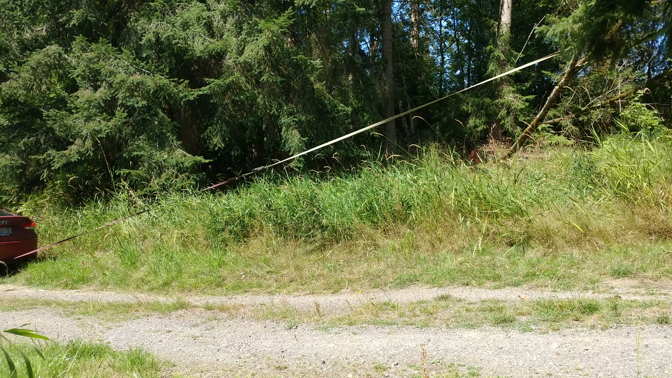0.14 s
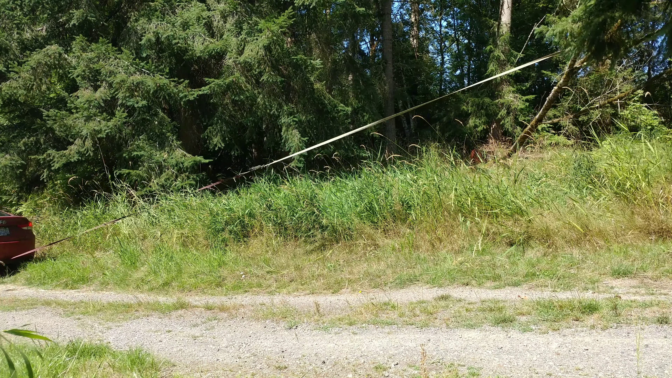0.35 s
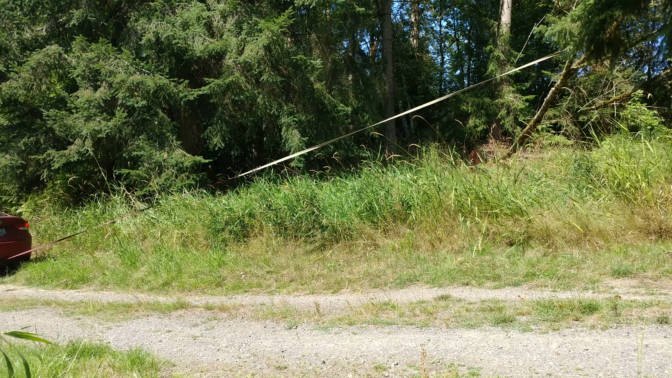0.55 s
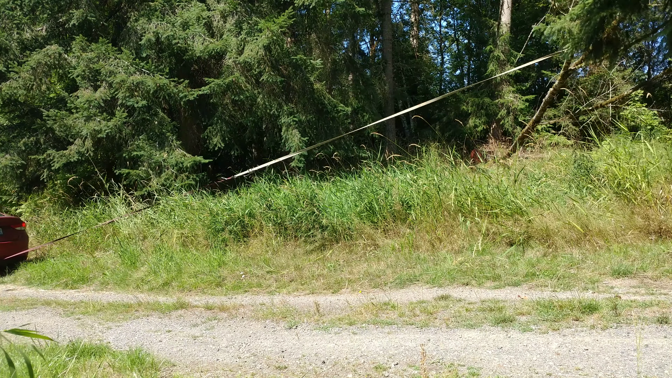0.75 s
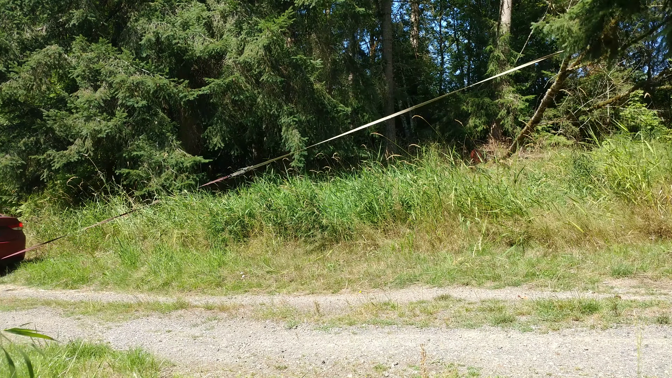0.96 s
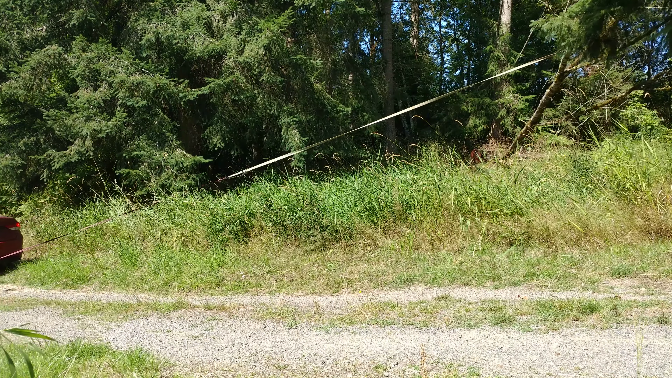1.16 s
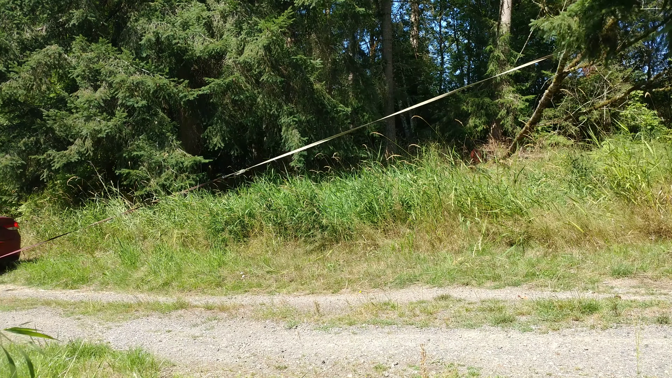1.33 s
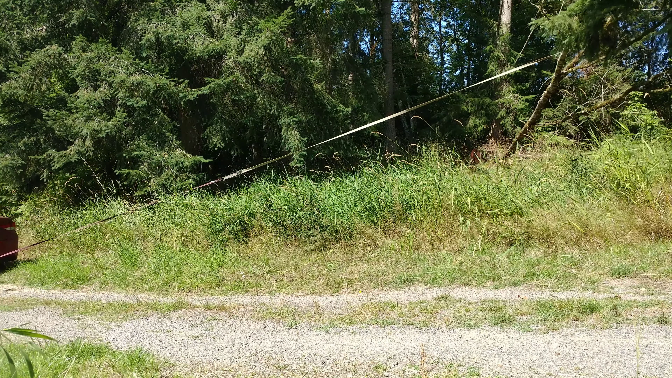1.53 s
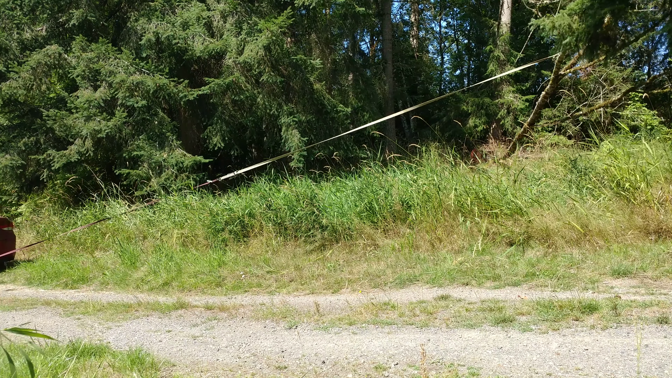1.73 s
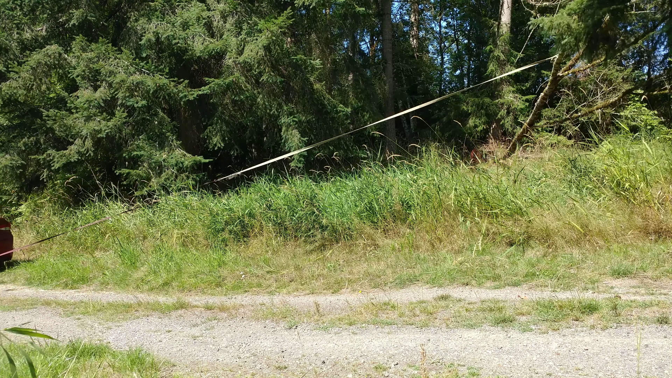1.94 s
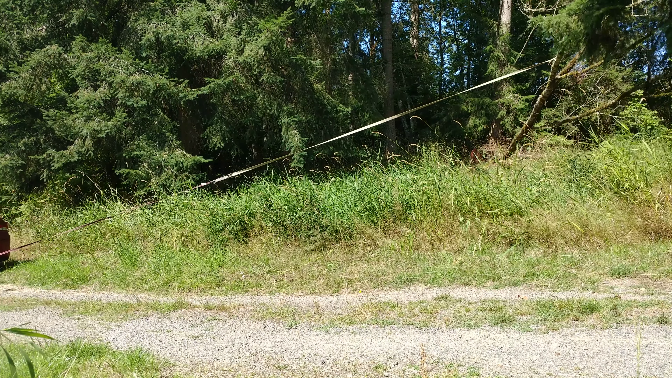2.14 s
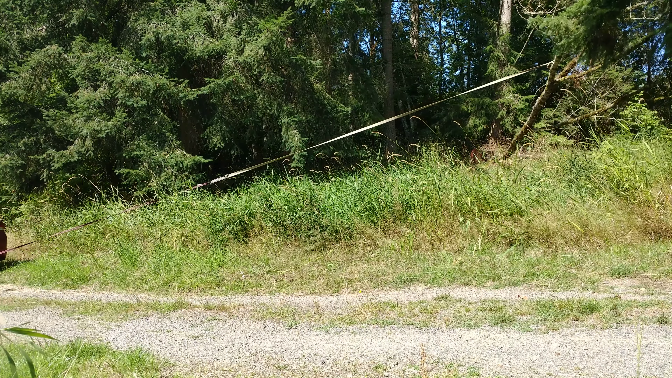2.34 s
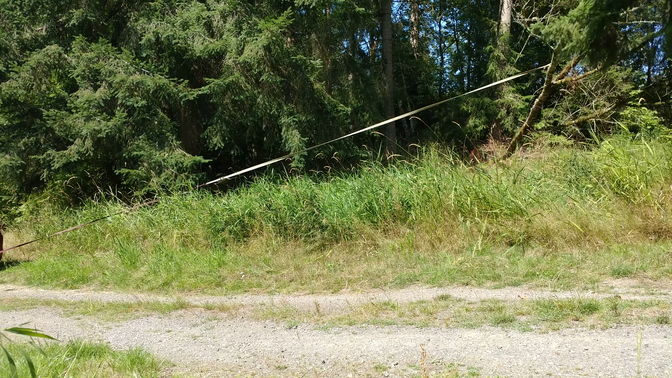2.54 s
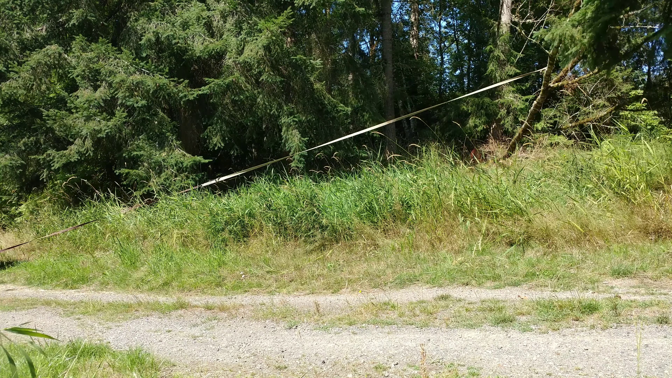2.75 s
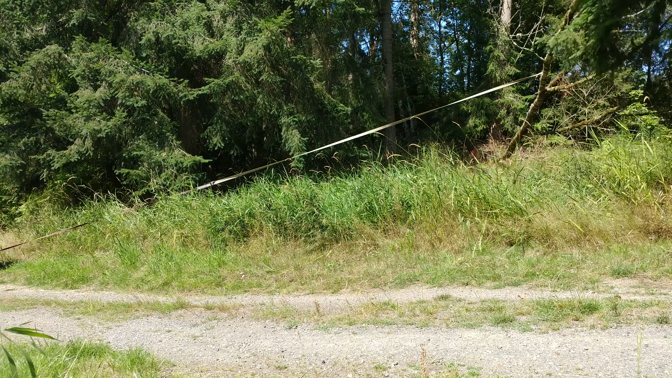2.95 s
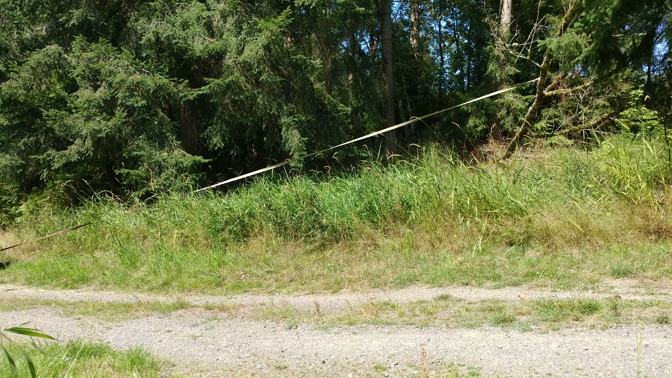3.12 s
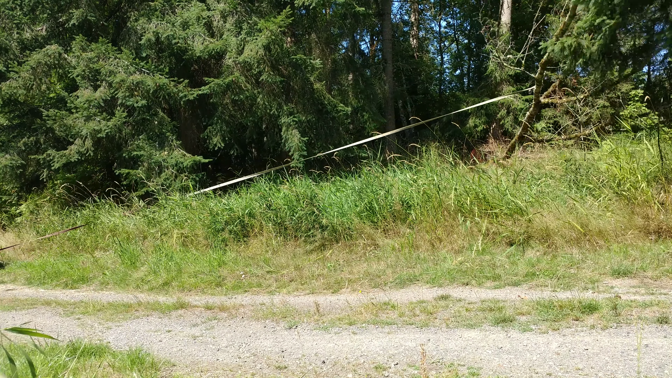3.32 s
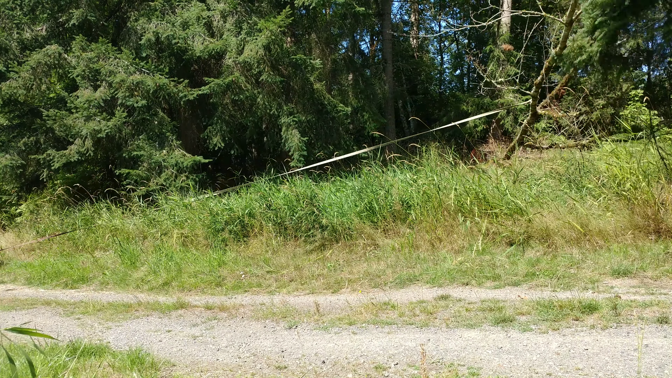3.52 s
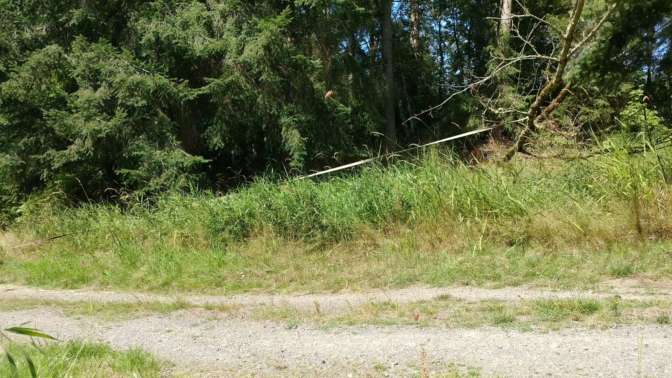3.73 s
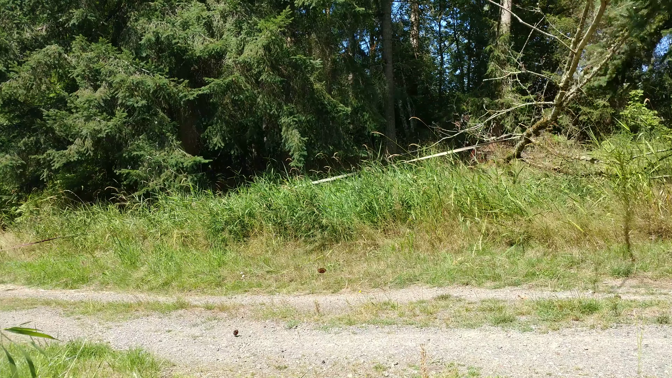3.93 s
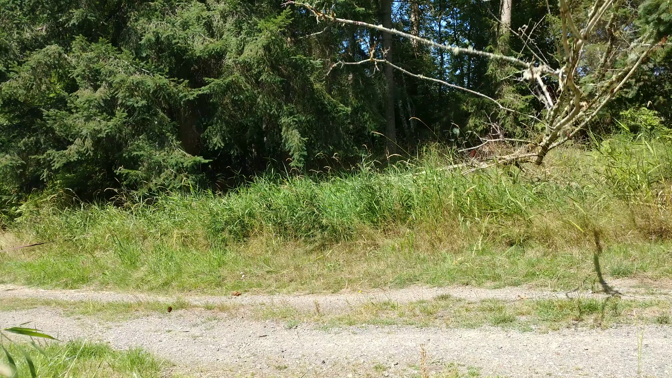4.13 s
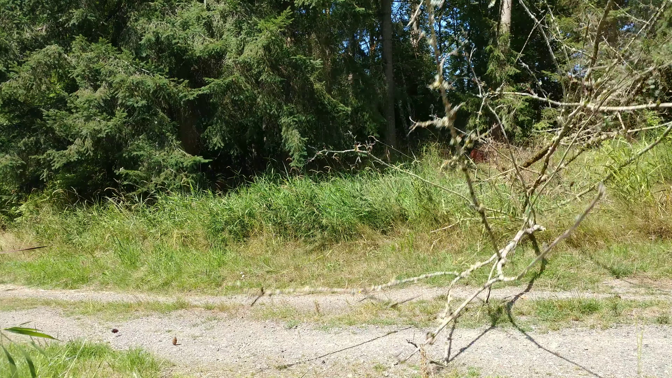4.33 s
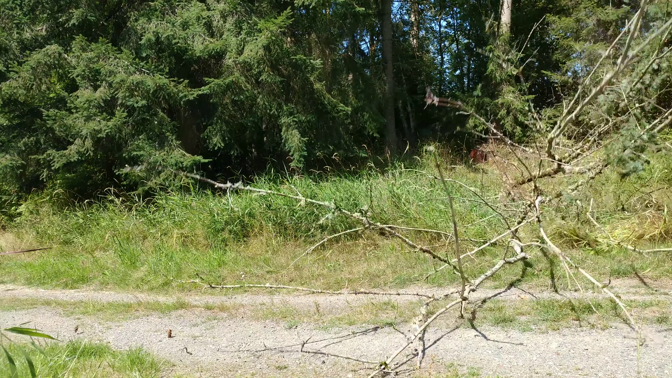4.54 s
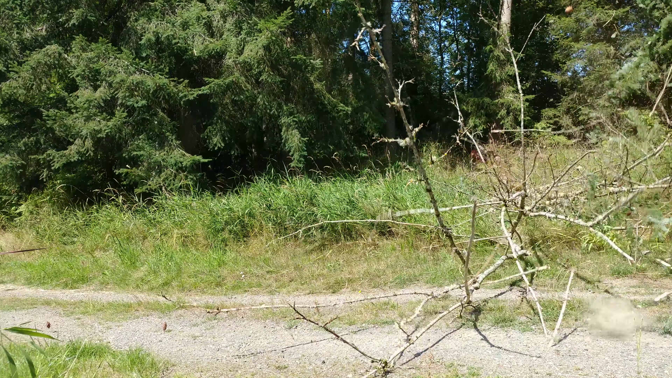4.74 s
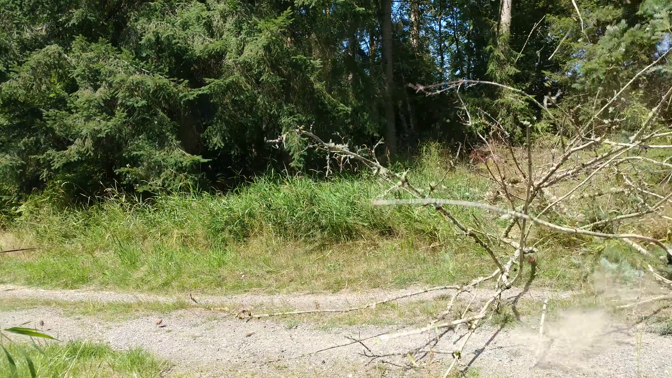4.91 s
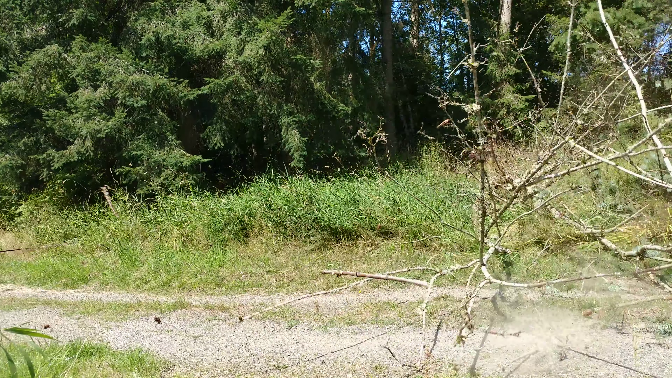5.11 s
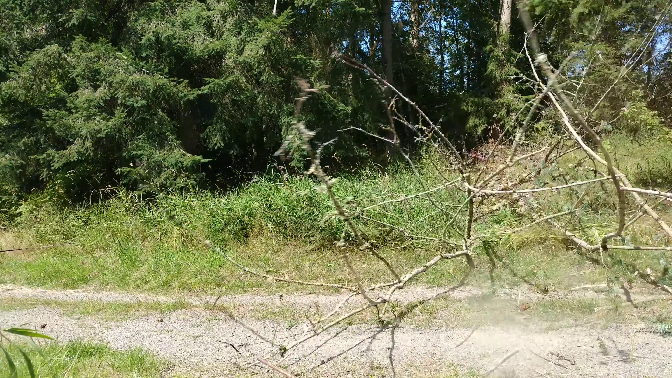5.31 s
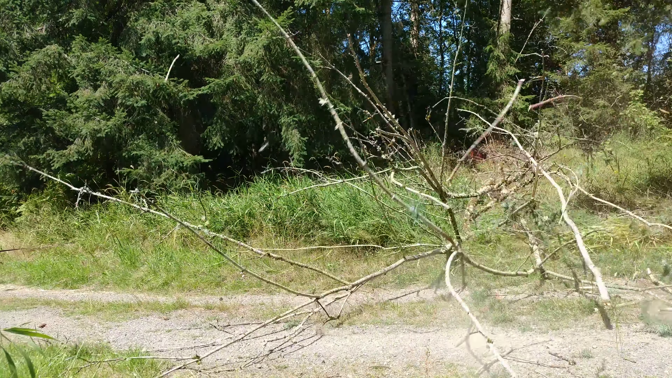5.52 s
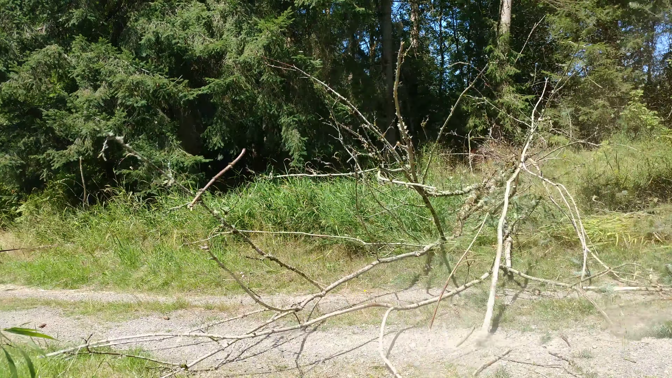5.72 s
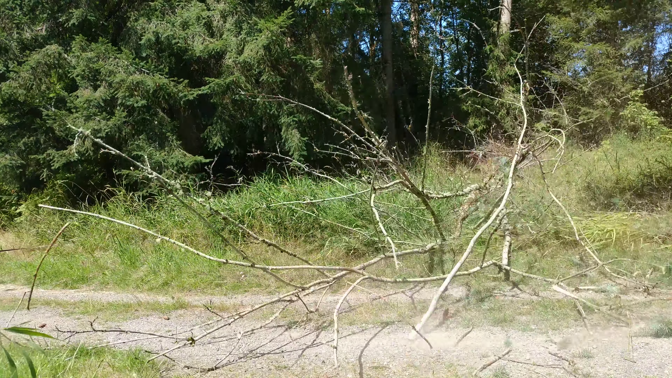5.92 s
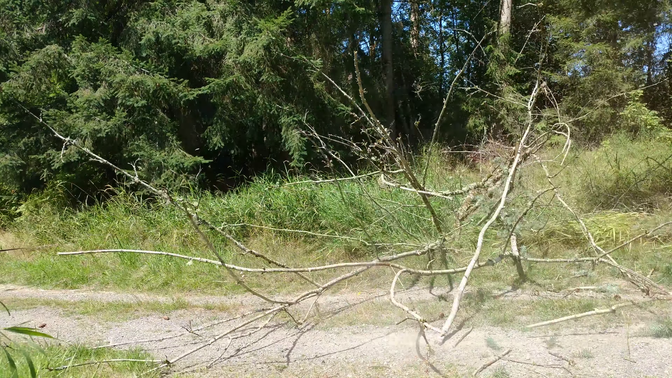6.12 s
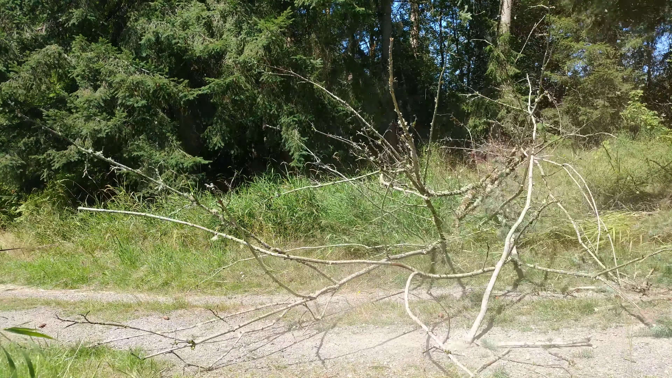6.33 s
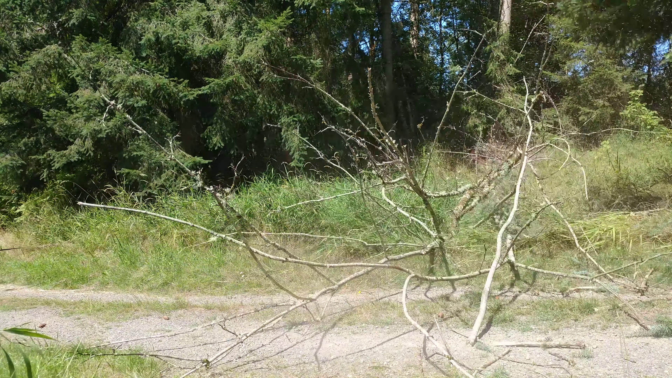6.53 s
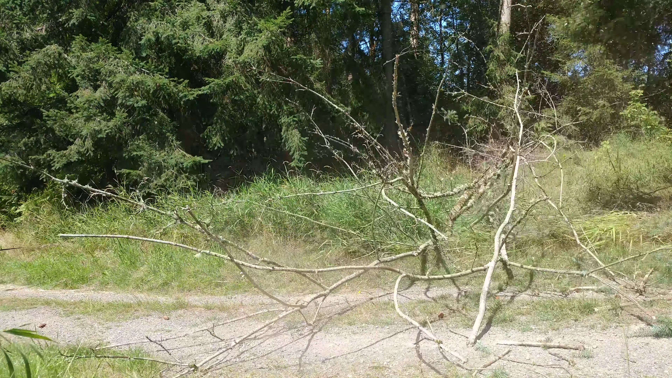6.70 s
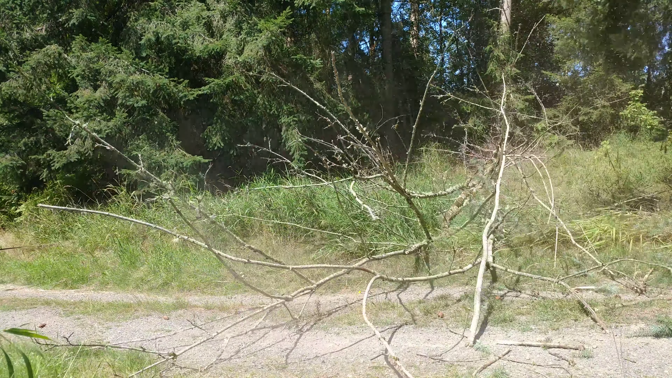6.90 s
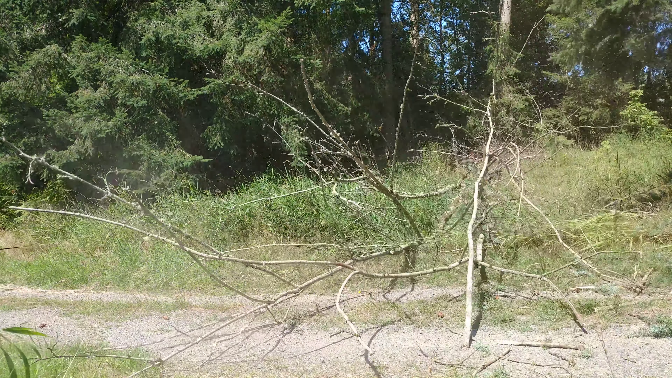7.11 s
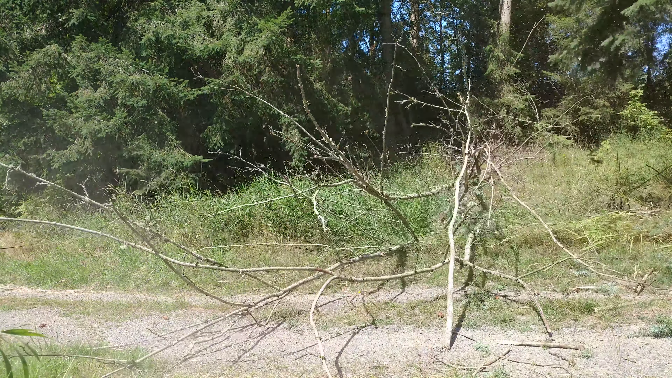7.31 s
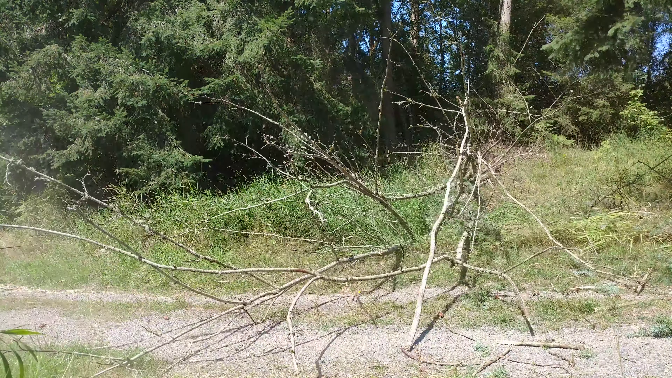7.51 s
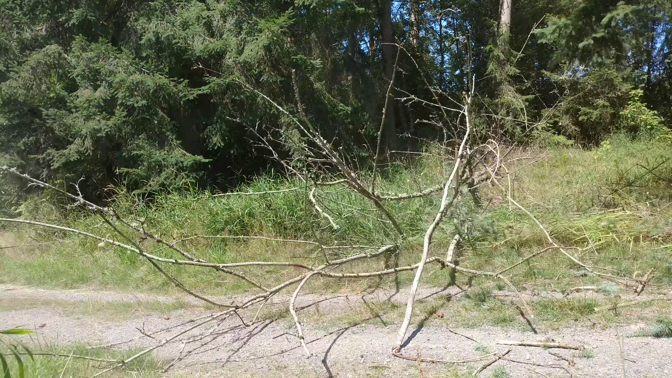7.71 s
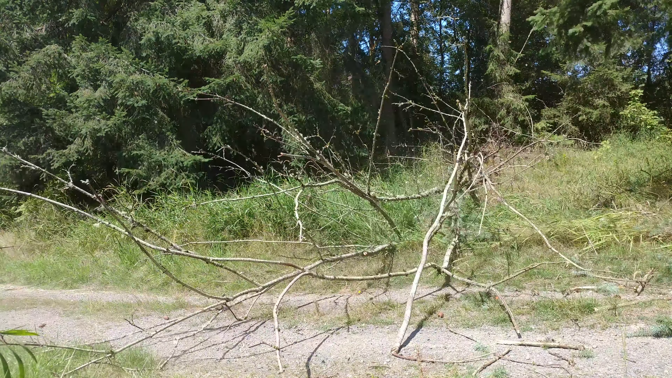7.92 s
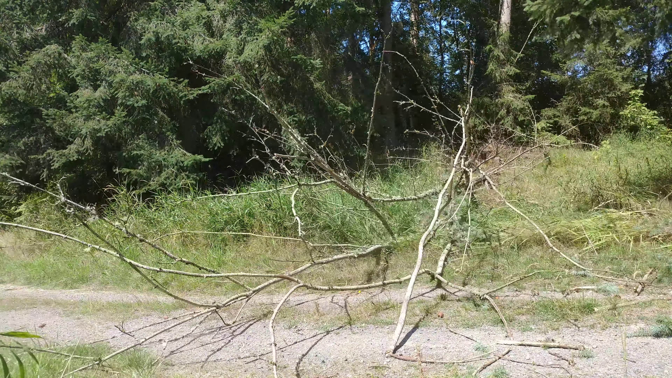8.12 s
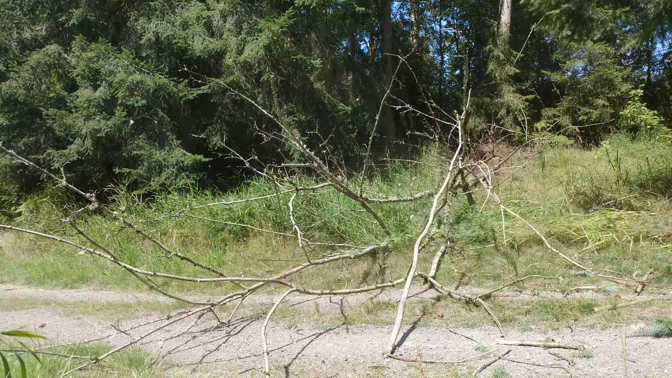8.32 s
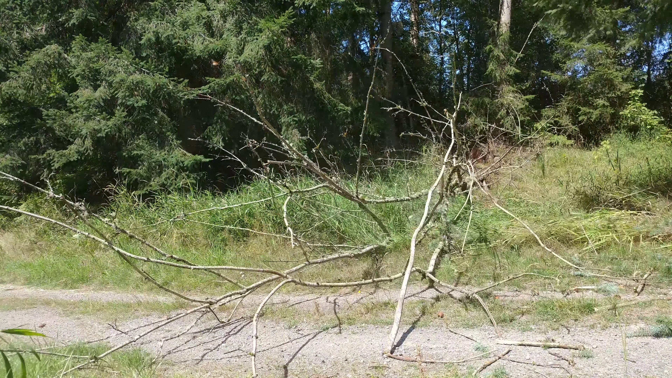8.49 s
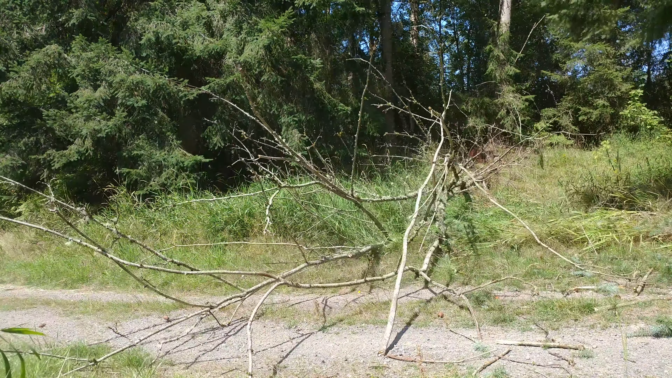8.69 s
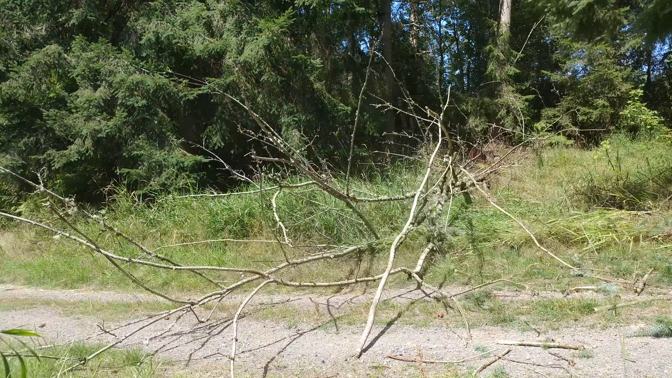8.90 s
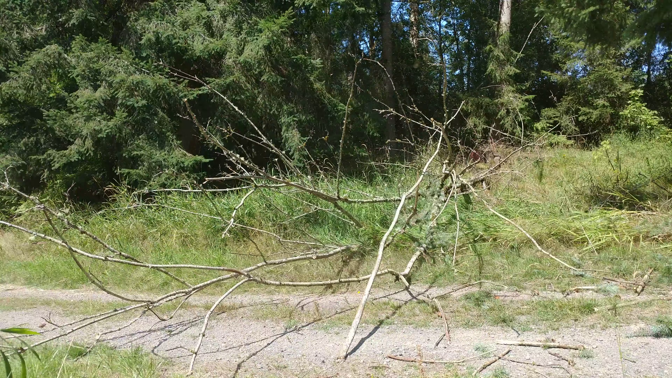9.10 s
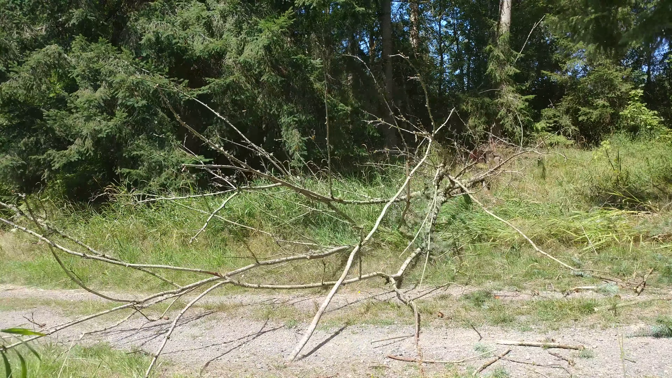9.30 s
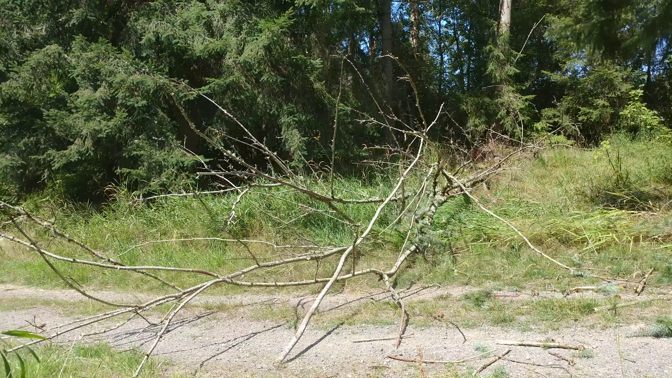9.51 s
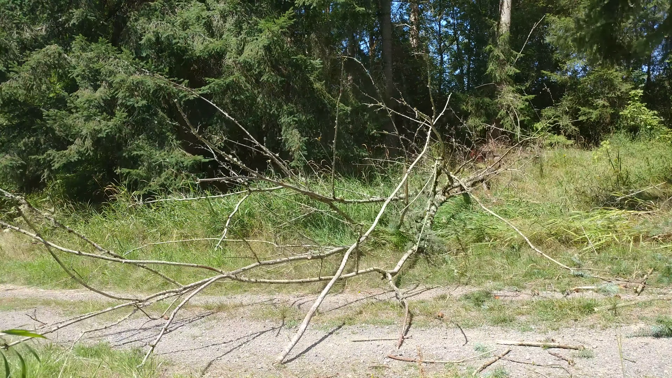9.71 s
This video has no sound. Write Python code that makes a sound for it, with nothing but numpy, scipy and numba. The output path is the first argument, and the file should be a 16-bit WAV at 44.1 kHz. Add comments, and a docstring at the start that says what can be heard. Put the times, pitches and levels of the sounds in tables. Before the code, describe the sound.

A dead tree is pulled over outdoors: faint ticks, two sharp cracks, then a dense, splintering crash of dry branches and scattered late snaps.

```python
"""A dead tree is pulled over at the edge of a wood: fibres tick, twigs rub, and the stem cracks twice.
Its dry crown crashes onto a gravel track; dragged on, it loses two more limbs and knocks on the ground.
Noise bursts through resonances make snaps and knocks, a falling chirp the bending limbs, shaped noise the rest.
The trees echo the breaking wood over a low outdoor rumble, and a small stereo microphone limits the loudest cracks."""
import sys
import numpy as np
from scipy import signal
from scipy.fft import rfft, irfft
from scipy.io import wavfile
from scipy.ndimage import uniform_filter1d, minimum_filter1d
from numba import njit

SR = 44100
rng = np.random.default_rng(int(sys.argv[2]) if len(sys.argv) > 2 else 0)


def wrap_up_sound(samples):
    """Save the sound to the file named by the first command line argument, as 16-bit audio."""
    columns = np.atleast_2d(samples).T
    # keep every value between -1 and 1, then stretch to whole-number steps
    tamed = np.clip(columns, -1, 1)
    steps = np.round(tamed * 32767).astype(np.int16)
    wavfile.write(sys.argv[1], SR, steps)


N = 429975
TIME = np.arange(N) / SR
SHORT = TIME[:2048]
LONG = TIME[:16384]


def undb(db):
    """Decibels to gain."""
    return 10 ** (np.asarray(db) / 20)


def steady(x):
    """Scale to rms 1."""
    return x / np.sqrt(np.mean(x ** 2))


def blow(x):
    """Scale to the energy of 4 ms at rms 1."""
    return x / np.sqrt(np.sum(x ** 2) / (.004 * SR))


def band(x, lo_hz, hi_hz, order=2):
    """Butterworth band-pass."""
    sos = signal.butter(order, [lo_hz, min(hi_hz, .45 * SR)], "band", fs=SR, output="sos")
    return signal.sosfilt(sos, x)


def ring(x, hz, width_hz):
    """One resonance, gain 1 at its centre."""
    b, a = signal.iirpeak(min(hz, .45 * SR), hz / min(width_hz, SR / 4), fs=SR)
    return signal.lfilter(b, a, x)


def colour(x, points, size=4096):
    """Causal minimum-phase filter through (Hz, dB) points, by way of the cepstrum."""
    hz, db = np.transpose(points)
    bin_hz = np.arange(size // 2 + 1) * SR / size + 1
    gain = undb(np.interp(np.log(bin_hz), np.log(hz), db))
    cepstrum = irfft(np.log(gain))
    # fold the negative times onto the positive ones
    cepstrum[1:size // 2] *= 2
    cepstrum[size // 2 + 1:] = 0
    response = irfft(np.exp(rfft(cepstrum)))
    filtered = signal.oaconvolve(np.atleast_2d(x), response[None], axes=1)
    return filtered[:, :x.shape[-1]].reshape(x.shape)


def add(out, s, sound, lag):
    """Put a stereo sound in at time s; from the right it reaches the left port lag samples late."""
    for channel, start in enumerate((int(s * SR + lag), int(s * SR))):
        if 0 <= start < N:
            out[channel, start:start + sound.shape[1]] += sound[channel, :N - start]


def port_lag(s):
    """The tree stands to the right and is dragged toward the middle (lag in samples)."""
    return np.interp(s, [4.8, 7.5, 8.5], [8, 4, 0])


def swell(s, rise_s, fade_s):
    """Builds up to a peak of 1 at time s, then dies away."""
    before = np.minimum(TIME - s, 0)
    after = np.maximum(TIME - s, 0)
    return np.exp(-(before / rise_s) ** 2 - after / fade_s)


def surge(size=1100):
    """Random swells, each about size samples long, with a spread of 1."""
    held = np.repeat(rng.standard_normal(N // size + 1), size)
    return steady(uniform_filter1d(held, size // 2)[:N])


def reflect(x, mid, side, alike_hz=1100):
    """The sound plus its reflections at both ports; long waves reach both alike."""
    side = signal.lfilter(*signal.butter(1, alike_hz, "high", fs=SR), side)
    x = np.broadcast_to(x, (2, x.shape[-1]))
    echoes = signal.oaconvolve(x, np.array([mid + side, mid - side]), axes=1)
    return x + echoes[:, :x.shape[1]]


def scatter(sound, near_db=-8, near_s=0.0094):
    """Ground and nearby branches scatter each sound in a way of its own, from 1 ms after it."""
    near = rng.standard_normal((2, len(SHORT))) * np.exp(-SHORT / near_s) * (SHORT > .001)
    mid, side = undb(near_db) * near / np.linalg.norm(near)
    return reflect(sound, mid, side)


def fibres(envelope, uneven_db):
    """A run of tiny fractures: noise whose level changes at random every 16 samples."""
    fracture, size = rng.standard_normal((2, len(envelope)))
    group = np.arange(len(envelope)) // 16
    return envelope * fracture * undb(uneven_db * size[group])


def snap(hz, body_db, tick_db, tear_s, damping=0.38, body_hz=950, tick_hz=9000):
    """A stick gives way at once and tears on briefly, ringing its bending modes."""
    first_split = 1.1 * blow(fibres(np.exp(-SHORT / .0006), uneven_db=1))
    tear = first_split + blow(fibres(np.exp(-SHORT / max(tear_s, .0005)), uneven_db=2.5))
    modes = ring(tear, hz, damping * hz)
    modes = modes + 0.31 * ring(tear, 0.73 * hz, damping * hz / 2)
    modes = modes + 0.22 * ring(tear, 1.49 * hz, damping * hz)
    body = ring(ring(tear, body_hz, 1500), body_hz, 1640)
    tick = ring(ring(tear, tick_hz, 6100), tick_hz, 6100)
    # a thin stick radiates little far from its own pitch
    pitched = blow(ring(modes, hz, 1.28 * hz))
    return pitched + undb(body_db) * blow(body) + undb(tick_db - 2.5) * blow(tick)


# Dry sticks snapping: start_s, level_db (played 1 dB up), pitch_hz, body_db,
# tick_db (bright, played 2.5 dB down), tear_s
STICK_SNAPS = [(.3035, -36.5, 4200, -11, 6, 0.036), (.4308, -25.5, 4260, -16, 2, .0023),
               (.6296, -32.5, 3320, -12, -1, 0.0024), (0.685, -35.5, 3540, -15, 1, .01),
               (0.7693, -28, 3350, -17, -1.5, 0.0053), (1.2806, -34, 3600, -5, -2.5, 0.023),
               (1.3645, -27, 3200, -7, 4.5, 0.0098), (1.531, -36.5, 5200, -15, -6.5, .003),
               (1.64, -31.5, 2780, -25, 1, 0.0061), (1.6928, -30, 2610, -2.5, -2, 0.036),
               (1.77, -24, 3000, -22, 2, 0.0021), (1.853, -34, 3600, -8, 8, .0075),
               (1.8994, -8, 3100, -13.5, -8, 0.0012), (2.0887, -36, 6440, -30, -3, .0035),
               (2.4389, -33.5, 4970, -2.5, 0.5, 0.0067), (2.538, -28.5, 2920, -22.5, 6, 0.0055),
               (2.6761, -7, 2080, -6.5, -3.5, 0.016), (2.713, -15, 3680, -17, -7, 0.0098),
               (2.9318, -22.5, 2460, -10, 2, 0.014), (3.015, -25, 3830, -1, 4, 0.0033),
               (3.2026, -20.5, 3700, -11.5, -2.5, 0.039), (3.281, -27.5, 4110, -18, 7.5, 0.0033),
               (3.4175, -11, 2250, -13, -10, 0.0018), (3.6451, -9.5, 2930, -16, 2.5, 0.0012),
               (3.8855, -22.5, 3900, -12, 2.5, 0.0025), (3.9305, -20, 3180, -15, 5.5, 0.0078),
               (3.9643, -18.5, 1850, -0.5, 7.5, 0.083), (4.1254, -19.5, 5540, -13, -7, 0.0053),
               (4.2168, -10, 3870, -8.5, -1, 0.054), (4.285, -9.5, 3720, -11, 4, .003),
               (4.3479, -9, 3500, -7, -0.5, 0.037), (4.401, -18, 3420, -10.5, 2.5, 0.0035),
               (4.459, -11.5, 4400, -3.5, 6, 0.068), (4.562, -8, 2870, -12, -4, 0.0015),
               (4.589, -12, 3200, -15, 2, 0.0015), (4.6293, -8, 3950, -13, 2.5, 0.063),
               (4.6766, -3.5, 3700, -7, 3.5, 0.026), (4.6969, -13, 2560, -2, 5, 0.0098),
               (4.7657, 10, 3870, -12, -23, 0.0021), (4.783, -2, 4640, -6, -11, .002),
               (4.916, -5, 3830, -11.5, -10, 0.0015), (4.9325, -2.5, 3400, -8.5, -34, 0.0085),
               (5.016, -11, 2480, -3, -27, 0.011), (5.1042, -11.5, 4600, -15.5, -5.5, .002),
               (5.1772, -17, 3620, -14, -10.5, .002), (5.202, -13, 4500, -20, -11, 0.00087),
               (5.209, -5.5, 4700, -13, -4.5, 0.0035), (5.2176, -4, 1870, -10.5, -2.5, 0.0027),
               (5.255, -15, 5050, -16, -2.5, 0.0049), (5.47, -20, 4720, -9, -5, .023),
               (5.5343, 1.5, 3700, -6, -2.5, 0.0022), (5.5423, -6, 2420, -18, 1.5, 0.0029),
               (5.789, -26.5, 4540, -22, 8, .005), (5.836, -27, 4000, -14, -0.5, 0.0056),
               (5.8825, -21.5, 2440, -12, -14, 0.0053), (5.942, -4.5, 3700, -15, -10, 0.0011),
               (5.999, -19.5, 2960, -28, -18, 0.0059), (6.149, -17.5, 3000, -20, -18, 0.0061),
               (6.4899, -27, 3700, -16, -3, .006), (6.6684, -32.5, 5570, -20, -19, .004),
               (6.8787, -31.5, 3300, -11, 0, 0.036), (7.0367, -30.5, 2800, -3.5, -18, 0.015),
               (7.2471, -39, 5540, -12, 11, .004), (7.292, -13.5, 6370, -7.5, -13, 0.00079),
               (7.5922, -10, 3900, -7, 0.5, 0.001), (7.6047, -14, 4650, -16, -15, 0.0016),
               (8.107, -41, 2030, 1.5, -16, 0.013), (8.828, -41, 4120, -19.5, 8.5, 0.0053)]


def snaps():
    """Single loud snaps, each a burst of fractures through the modes of its stick."""
    out = np.zeros((2, N))
    for s, db, hz, body_db, tick_db, tear_s in STICK_SNAPS:
        stick = undb(db + 1.0) * snap(hz, body_db, tick_db, tear_s)
        add(out, s, scatter(stick), port_lag(s))
    return out


WAVE_TRAVEL_S = .042  # sets how long the bending wave runs along a limb


def bending_wave(travel_s, hz=600):
    """A kick runs along a limb; high notes travel faster, so it arrives as a falling chirp."""
    f = np.arange(len(LONG) // 2 + 1) * SR / len(LONG) + 1
    strength = 1 / (1 + (np.log2(f / hz) / .65) ** 2) ** 1.5
    dispersion = np.exp(-4j * np.pi * travel_s * np.sqrt(f * hz))
    return blow(irfft(strength * dispersion))


# Colour of splintering wood: frequency_hz, level_db
SPLINTER_COLOUR = [(59, -53), (100, -3), (268, -13.5), (620, -6.5), (1530, -3), (2270, -2), (2520, -5),
                   (3680, -2), (6760, -20.5), (8520, -6), (10700, -18), (15000, -33.5)]
# Thick limbs breaking: start_s, splinter_db, build_up_s, fade_s, top_hz (brightness limit),
# wave_db, wave_s (bending wave's arrival after the start)
LIMB_BREAKS = [(1.903, -22, 0.019, 0.037, 8800, -25, 0.025),
               (2.676, -11.5, 0.0057, 0.011, 7950, -20.5, 0.023),
               (4.78, -18.5, 0.079, .037, 1140, -7, 0.061), (7.267, -25, .019, 0.013, 6140, -21.5, .021),
               (7.315, -33, 0.0055, 0.052, 6500, -45, 0.012),
               (7.567, -19.5, 0.025, .014, 5850, -14.5, 0.025), (7.592, -29, 0.0064, .12, 8950, -35, .03)]


def breaks():
    """Splintering builds up, the limb lets go with a bending wave, and the splinters die away."""
    out = np.zeros((2, N))
    for s, db, rise_s, fade_s, top_hz, wave_db, wave_s in LIMB_BREAKS:
        build_up = np.minimum(0.24 + LONG / rise_s, 1)
        envelope = build_up * np.exp(-np.maximum(LONG - rise_s, 0) / fade_s)
        grains = colour(fibres(np.ones(len(LONG)), uneven_db=2.5), SPLINTER_COLOUR)
        splinters = steady(band(grains, 106, top_hz, order=3))
        add(out, s, scatter(undb(db) * envelope * splinters), port_lag(s))
        wave = undb(wave_db) * bending_wave(WAVE_TRAVEL_S)
        add(out, s + wave_s - WAVE_TRAVEL_S, scatter(wave), port_lag(s))
    return out


# Hollow modes of a bough: pitch_multiple, width_hz, level_db
BOUGH_MODES = [(.62, 190, 10.5), (.8, 211, -21), (1, 230, 30.5), (1.27, 280, -9), (1.6, 380, -27),
               (2.4, 550, -17)]
# Boughs hitting the ground: start_s, level_db (played 4 dB down), pitch_hz, chatter_s
BOUGH_KNOCKS = [(3.418, -17, 770, 0.041), (4.78, -6.5, 702, .0064), (4.808, -7.5, 950, 0.0092),
                (4.846, -5, 1040, 0.0034), (4.86, -14, 760, 0.011), (5.212, -11, 1240, 0.0058),
                (5.542, -7, 1080, 0.0083), (5.622, -11.5, 980, 0.045), (5.705, -15.5, 945, 0.034),
                (5.735, -13, 930, 0.048), (5.768, -9, 990, 0.017), (5.885, -18, 840, 0.052),
                (5.918, -13.5, 1190, 0.072), (6.005, -18.5, 1070, 0.046), (6.151, -21.5, 1150, 0.021),
                (6.225, -27, 1230, 0.016), (9.372, -30, 880, 0.028), (9.452, -25, 946, 0.03),
                (9.702, -35.5, 1160, 0.013)]


def knocks():
    """A bough lands, chatters on the gravel and rings with its hollow modes."""
    out = np.zeros((2, N))
    for s, db, pitch_hz, chatter_s in BOUGH_KNOCKS:
        contact = fibres(np.exp(-SHORT / max(chatter_s, .001)), uneven_db=3.0)
        wood = np.zeros(len(SHORT))
        for k, (multiple, width_hz, mode_db) in enumerate(BOUGH_MODES):
            # neighbouring modes move in opposite directions
            wood += (-1) ** k * undb(mode_db) * ring(contact, multiple * pitch_hz, width_hz)
        add(out, s, scatter(undb(db - 4.0) * blow(band(wood, 295, 1900))), port_lag(s))
    return out


REST_S, REST_SLOWING_S, REST_DB = 9.45, 0.28, -7  # the pull ends; drag and outdoor rumble quieten


def at_rest():
    """Goes from 0 to 1 as the pull ends."""
    return np.clip((TIME - REST_S) / REST_SLOWING_S, 0, 1)


STRAIN_S, STRAIN_DB = 1.38, -58.5  # the stem has started to give and crackles softly
STEM_BREAKS_S = 2.68
DRAG_DB, DRAG_FADE_DB_PER_S = -56.5, 4  # the fallen crown is dragged on, ever more gently
USUAL_FORCE_DB = -29.5
# Force with which the falling crown crushes its branches: time_s, force_db
FALL_FORCE = [(2.8, -35.5), (2.85, -34), (3.28, -33), (3.56, -27), (3.71, -33), (3.94, -31.5), (4.11, -26),
              (4.21, -24), (4.66, -22.5), (4.83, -18), (5.27, -28), (5.8, -32), (6.57, -50), (6.7, -62)]


def force_db():
    """Load on the branches, in dB over the usual: strain, the fall once the stem breaks, then dragging."""
    s, db = np.transpose(FALL_FORCE)
    strain = STRAIN_DB - 18 * np.clip((STRAIN_S - TIME) / .2, 0, 1)
    fall = np.interp(TIME, s, db)
    drag = DRAG_DB - DRAG_FADE_DB_PER_S * (TIME - s[-1]) + REST_DB * at_rest()
    return np.select([TIME < STEM_BREAKS_S, TIME < s[-1]], [strain, fall], drag) - USUAL_FORCE_DB


LANDING_S, LANDING_RISE_S, LANDING_FADE_S = 4.83, 0.11, 0.073  # the whole crown meets the ground
# Colour of the dry crown: frequency_hz, level_db
TWIG_COLOUR = [(150, -25), (310, 7.5), (450, 0.5), (700, 1), (950, 5.5), (1500, 3.5), (2500, 6), (4300, 6),
               (6000, 4), (9000, -4), (16000, 6)]
# Wood from boughs to twigs: low_hz, high_hz, level_db (at the usual force),
# growth_db (per dB of force), landing_db
CROWN_WOOD = [(170, 1098, -34.5, 0.71, -12.5), (966, 8200, -28.5, 1, -8), (5860, 13140, -28.5, 1.06, -7)]


def crown(per_second=560, spread=3.8, hiss_db=-6, handful_db=1.5, uneven_db=4.0, count=160):
    """Hundreds of sticks snap across the width of the crown, over the hiss of brushed needles and grit."""
    bank = []
    for a, b, c, d in rng.random((count, 4)):
        stick = snap(1300 * 4.5 ** a, -14 + 13 * b, -9 + 12 * c, .0015 + .008 * d)
        bank.append(scatter(stick))
    when, size, place = rng.random((int(per_second * N / SR), 3)).T
    times = when * N / SR
    gains = undb(uneven_db * np.minimum(-np.log(1 - size), 2.6))
    lags = port_lag(times) + spread * (2 * place - 1)  # samples
    sticks = np.zeros((2, N))
    for k, (s, gain, lag) in enumerate(zip(times, gains, lags)):
        add(sticks, s, gain * bank[k % count], lag)
    hiss = steady(scatter(rng.standard_normal(N), near_db=8.5))
    crackle = colour(steady(sticks) + undb(hiss_db) * hiss, TWIG_COLOUR)
    force = force_db()
    landing = swell(LANDING_S, LANDING_RISE_S, LANDING_FADE_S)
    out = np.zeros((2, N))
    # thick and thin wood give way in separate handfuls
    for lo_hz, hi_hz, db, growth, landing_db in CROWN_WOOD:
        wood = steady(band(crackle, lo_hz, hi_hz, order=3))
        level = np.hypot(undb(db + growth * force), undb(landing_db) * landing)
        out += wood * undb(handful_db * surge()) * level
    return out


@njit
def glide(x, hz, damping):
    """State-variable band-pass whose centre moves."""
    y, b, l = np.empty(len(x)), 0., 0.  # output and the two filter states
    for i in range(len(x)):
        g = np.tan(np.pi * hz[i] / SR)
        v = (b + g * (x[i] - l)) / (1 + g * (g + damping))
        b, l, y[i] = 2 * v - b, l + 2 * g * v, damping * v
    return y


# Twigs and boughs rubbing: peak_s, level_db, pitch_hz (at the peak), glide_octaves_per_s, rise_s, fade_s
TWIG_RUBS = [(.635, -37.5, 3320, -2, .02, 0.021), (.69, -44, 3270, 3, 0.023, .03),
             (.775, -43, 3400, 3.5, .025, .08), (4.06, -30.5, 1344, 0.2, .15, .25),
             (9.05, -60.5, 3900, -1.2, 0.13, 0.08), (9.28, -62, 2530, -4, .09, .06),
             (9.44, -47, 1200, -.5, .1, .06)]


def rubs(damping=0.27):
    """Twigs catch and slip on each other, a rasp whose gliding pitch follows their free length."""
    out = np.zeros((2, N))
    for s, db, hz, octaves_per_s, rise_s, fade_s in TWIG_RUBS:
        during = (TIME > s - 2 * rise_s) & (TIME < s + 4 * fade_s)
        t = TIME[during]
        pitch = np.minimum(hz * 2 ** (octaves_per_s * (t - s)), SR / 4)
        grains = fibres(np.ones(len(t)), uneven_db=6.5)
        rasp = glide(glide(grains, pitch, damping), pitch, damping)
        sound = steady(rasp) * undb(db) * swell(s, rise_s, fade_s)[during]
        add(out, t[0], scatter(sound), port_lag(s))
    return out


# Springy branches swishing through needles and grass: peak_s, level_db, needle_db (over level_db), rise_s, fade_s
BRANCH_RUSTLES = [(.1, -69, 17.5, 0.039, 0.11), (.32, -54, 10.5, 0.013, 0.13), (.47, -53, -9, .04, 0.083),
                  (.79, -51, 3.5, 0.2, 0.22), (1.4, -50, 1, 0.095, 0.052), (1.53, -51.5, 6.5, 0.045, 0.15),
                  (1.8, -49.5, 2.5, 0.18, 0.25), (2.07, -44, 0, 0.18, 0.25), (2.58, -50.5, 3, 0.087, 0.071),
                  (3.56, -42, -4, 0.17, 0.12), (5.72, -41, 10.5, 0.11, 0.06), (6.36, -49, 7, 0.061, 0.057),
                  (6.73, -58, 12, 0.095, 0.46), (7.12, -51, 5, 0.027, 0.11), (7.7, -46, 13, 0.064, 0.11),
                  (8.24, -61, 14.5, 0.15, 0.086), (8.61, -57, 7.5, 0.021, 0.026),
                  (8.86, -58.5, 15.5, 0.042, .1), (9.02, -52, 5.5, 0.082, 0.22)]


def rustles(uneven_db=4.5):
    """Each shaken branch swishes: a soft rush of twigs with the hiss of needles on top."""
    grains = colour(np.array([fibres(np.ones(N), uneven_db) for _ in range(2)]), TWIG_COLOUR)
    twigs, needles = np.zeros(N), np.zeros(N)
    for s, db, needle_db, rise_s, fade_s in BRANCH_RUSTLES:
        shape = swell(s, rise_s, fade_s)
        twigs += undb(db) * shape
        needles += undb(db + needle_db) * shape
    rush = steady(band(grains, 330, 5500)) * twigs
    return rush + steady(band(grains, 7040, 12970, order=3)) * needles


def low_noise(side_db):
    """Noise that is nearly alike at both ports."""
    mid, side = rng.standard_normal((2, N))
    return mid + undb(side_db) * np.array([side, -side])


THUD_RISE_S, THUD_FADE_S = 0.036, 0.035
# The trunk's weight dropping on roots and soil: peak_s, level_db
TRUNK_THUDS = [(1.94, -43), (2.745, -30), (3.55, -38), (4.87, -22), (7.32, -45), (7.615, -36)]


def trunk(rolling_db=-44, growth=0.93):
    """The heavy stem grinds dully in the soil as the load grows, and thuds when its weight drops."""
    drops = sum(undb(db) * swell(s, THUD_RISE_S, THUD_FADE_S) for s, db in TRUNK_THUDS)
    rolling = undb(rolling_db + growth * force_db() + 2 * surge(size=3000))
    return steady(band(low_noise(side_db=-19), 66, 197)) * np.hypot(drops, rolling)


def forest(x, far_db=-8, low_t60_s=0.47, high_t60_s=0.47):
    """The wall of trees returns a long, grainy tail after each loud crack."""
    t = TIME[:32768]
    trunks = np.array([fibres(1 - np.exp(-t / 0.0021), uneven_db=7) for _ in range(2)])
    low = band(trunks, 90, 2500) * undb(-60 * t / low_t60_s)
    high = band(trunks, 2590, 12400) * undb(-60 * t / high_t60_s)
    far = low + 0.81 * high
    mid, side = undb(far_db) * far / np.linalg.norm(far)
    # fractures lie a few centimetres apart, so their timing differs in the direction of the trees
    sent = np.array([np.interp(TIME + .00008 * surge(size=24), TIME, channel) for channel in x])
    echoes = reflect(sent, mid, side) - sent
    return x + echoes


RUMBLE_DB, RUMBLE_SWELL_DB = -49.5, 2
AIR_DB = -61.5
# Colour of the low outdoor rumble: frequency_hz, level_db
OUTDOOR_COLOUR = [(20, -21), (38, -34), (50, 0), (75, -3.5), (100, -4), (150, -17.5), (300, -24.5),
                  (600, -44.5)]
# Colour of the faint wash of air: frequency_hz, level_db
AIR_COLOUR = [(200, -3), (350, 2.5), (600, 4), (1000, -3), (1600, -15), (4000, -17.5), (9000, -14.5),
              (16000, -29)]


def rumble(ground_db=-47, growth=0.38):
    """Low noise swells at random and deepens under the falling tree; a faint wash of air lies over it."""
    outdoors = undb(RUMBLE_DB + REST_DB * at_rest())
    ground = undb(ground_db + growth * force_db())
    swells = undb(RUMBLE_SWELL_DB * surge(size=4000))
    low = steady(colour(low_noise(side_db=-9.5), OUTDOOR_COLOUR)) * np.hypot(outdoors, ground) * swells
    air = steady(colour(low_noise(side_db=-4), AIR_COLOUR)) * undb(AIR_DB)
    return low + air


def scene():
    """All the breaking wood in the clearing, over the rumble."""
    small_wood = snaps() + knocks() + rubs()
    # fallen on the track, the twigs are nearer the microphone and further from the trees
    among_trees = undb(np.interp(TIME, [3.5, 5], [0, -7]))
    echoed = forest(breaks() + among_trees * small_wood)
    close = (1 - among_trees) * small_wood
    return echoed + close + crown() + rustles() + trunk() + rumble()


def limit(x, size=130):
    """Limiter: the gain dips for a few milliseconds around every peak over full scale."""
    gain = minimum_filter1d(1 / np.maximum(np.abs(x).max(axis=0), 1), size)
    return x * uniform_filter1d(gain, size)


TOP_HZ = 15900
# Colour of the microphone housing: frequency_hz, level_db
MIC_COLOUR = [(20, -4), (5000, 3.5), (7000, -0.5), (8400, 5), (9400, 0.5), (10100, -15), (10700, -23),
              (11600, -15.5), (13000, -6.5), (16000, 2)]
# Balance of the two ports: frequency_hz, left_minus_right_db
LEFT_FAVOUR = [(100, -0.5), (380, 0), (700, 1.5), (1300, 2), (4400, 3), (8100, 4.5), (11000, 19),
               (15000, -2.5)]


def record(dry):
    """The microphone housing colours the sound and mostly favours the left; peaks are limited, the top cut."""
    hz, lead_db = np.transpose(LEFT_FAVOUR)
    left = colour(dry[0], np.column_stack([hz, lead_db / 2]))
    right = colour(dry[1], np.column_stack([hz, -lead_db / 2]))
    limited = limit(colour(np.array([left, right]), MIC_COLOUR))
    top_cut = signal.ellip(8, .2, 70, TOP_HZ, fs=SR, output="sos")
    return signal.sosfilt(top_cut, limited)


dry = scene()
out = record(dry)
wrap_up_sound(out)
```